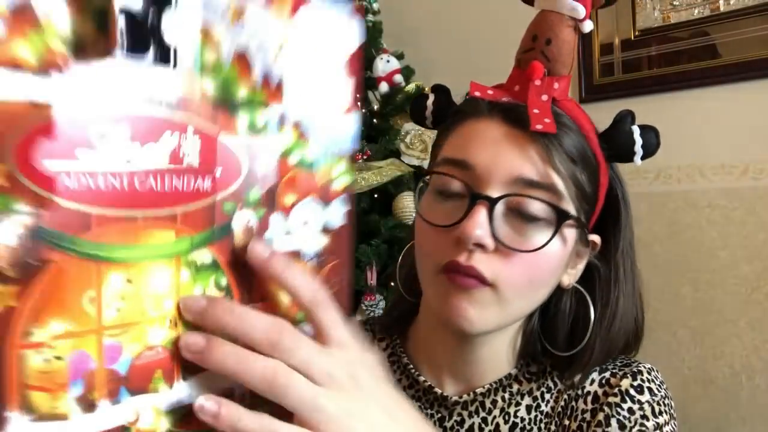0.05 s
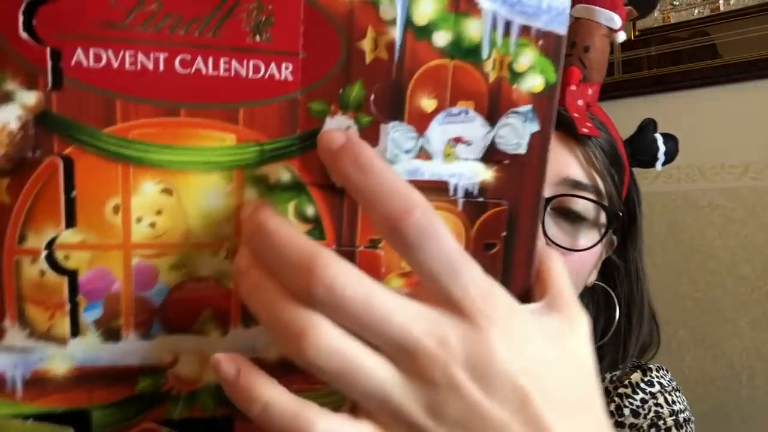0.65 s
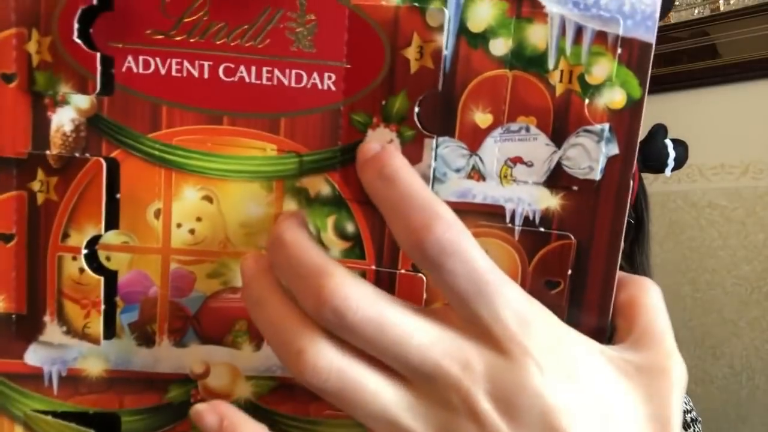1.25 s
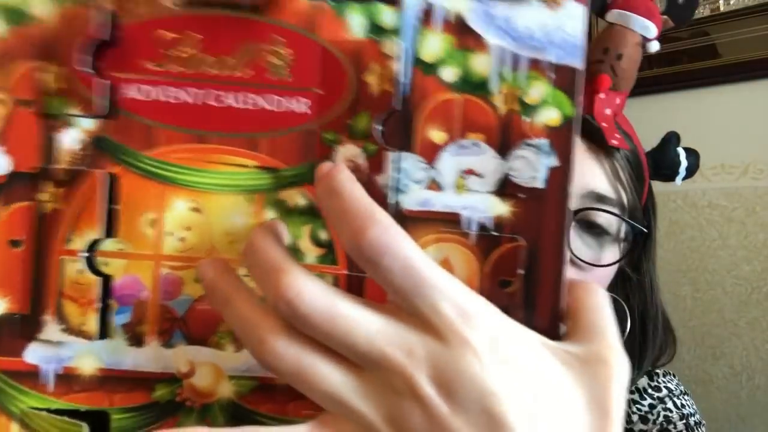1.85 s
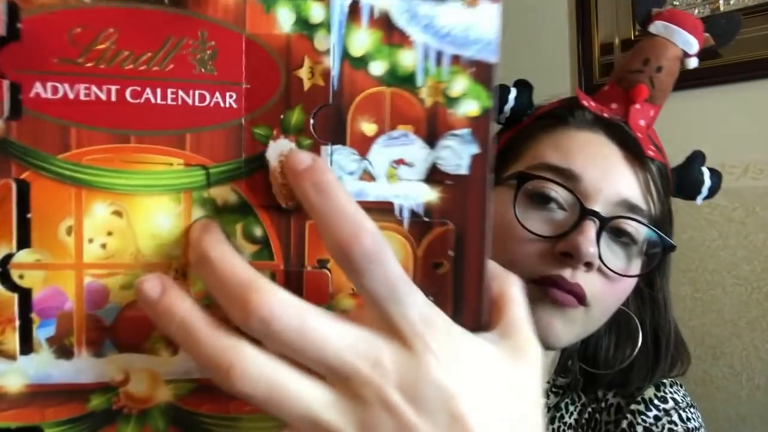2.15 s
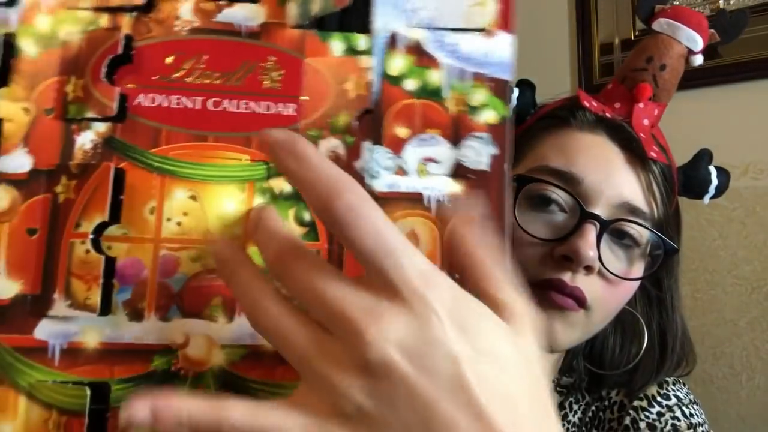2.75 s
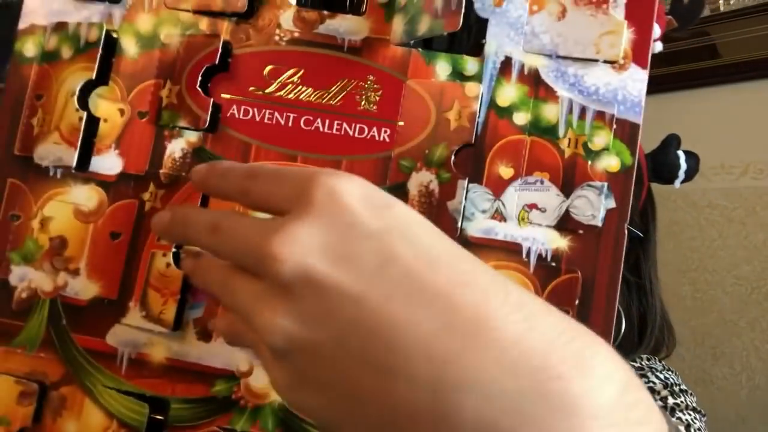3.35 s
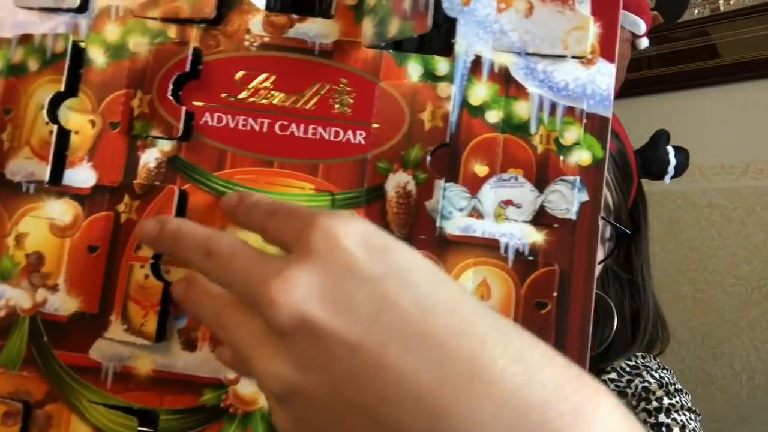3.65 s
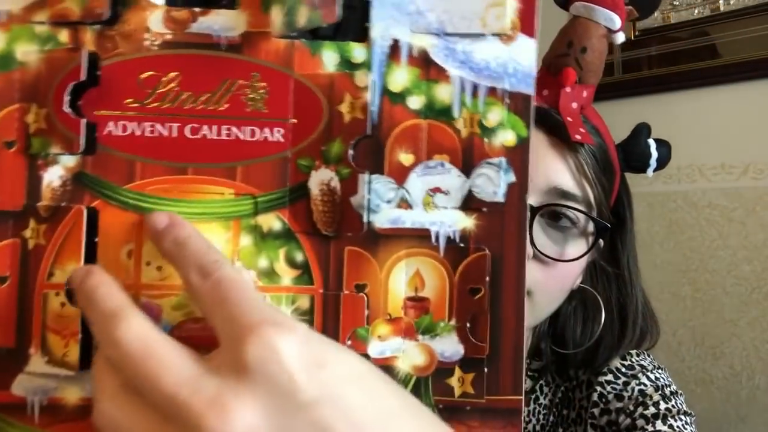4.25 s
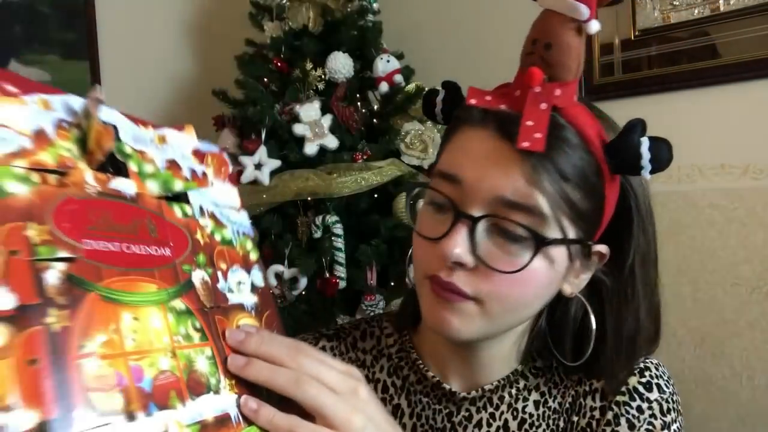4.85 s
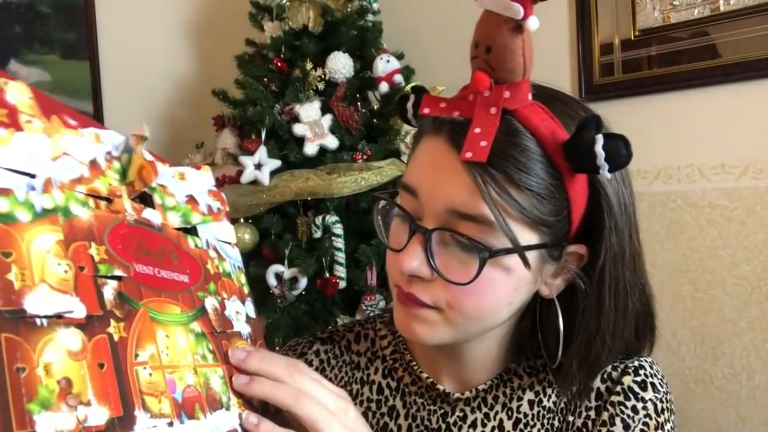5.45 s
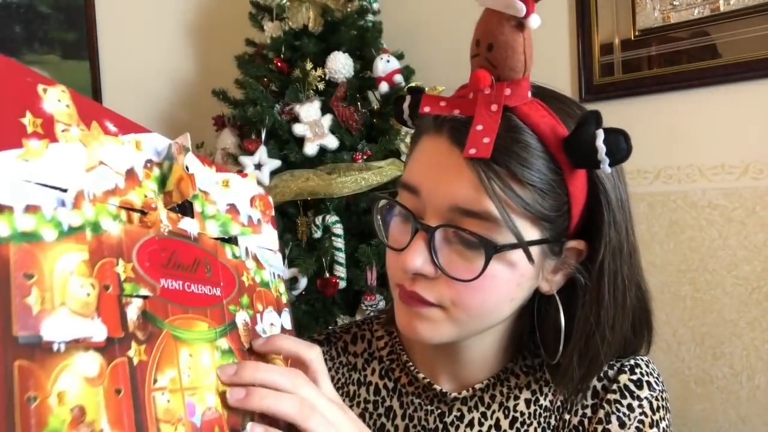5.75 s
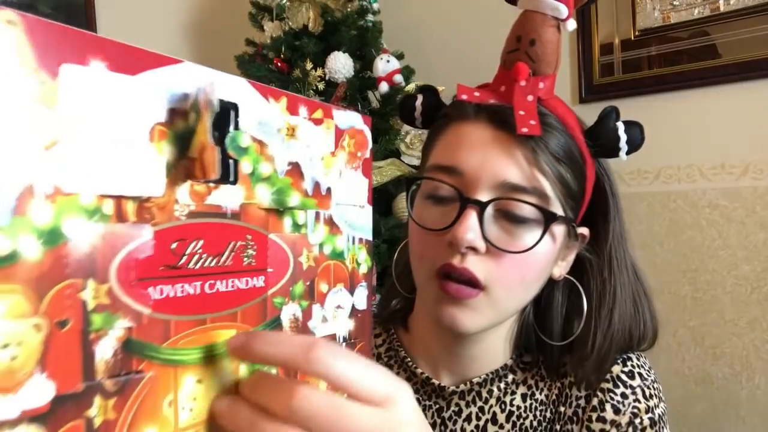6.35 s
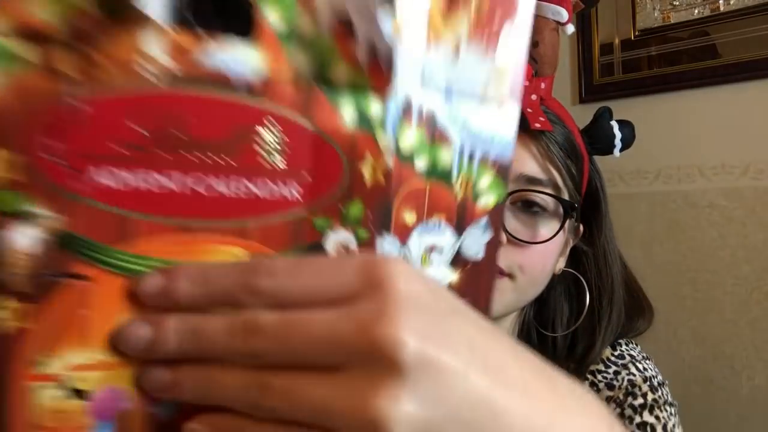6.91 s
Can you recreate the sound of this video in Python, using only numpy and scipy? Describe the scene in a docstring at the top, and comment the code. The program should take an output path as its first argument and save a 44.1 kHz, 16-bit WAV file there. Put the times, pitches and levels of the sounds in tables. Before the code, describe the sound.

A thin cardboard door is pressed and cracks open in sharp snaps, with fingers rubbing and tapping the hollow box.

```python
"""Living room, one microphone close to a thin cardboard box with a perforated door.
A fingertip leans on the door: the card creaks, the bridges snap one by one, the flap is pulled open.
Each release jolts the panel and the air behind it, and rattles between the edges of the card.
Fingers tap, rub and slide on the hollow box as it is turned, the skin sticking and slipping.
Further off, the walls answer each crack over faint room noise."""
import sys
import numpy as np
from scipy import signal
from scipy.fft import rfft, irfft, next_fast_len
from scipy.io import wavfile
from scipy.ndimage import uniform_filter1d, map_coordinates

SR = 44100
rng = np.random.default_rng(int(sys.argv[2]) if len(sys.argv) > 2 else 0)


def waveform_to_disk(signal):
    """Save audio, clipped to [-1, 1], as 16-bit WAV at the path in sys.argv[1]."""
    frames = np.transpose(np.atleast_2d(signal))
    scaled = np.clip(frames, -1, 1) * 32767
    samples = np.round(scaled).astype(np.int16)
    wavfile.write(sys.argv[1], SR, samples)


N = 307818
TIME = np.arange(N) / SR
SIZE = 4096  # samples in one response of the card
HZ = np.fft.rfftfreq(SIZE, 1 / SR)

# bridges breaking, the flap flicking free, the box knocking: t/s, panel level/dB, panel f/Hz,
# panel sharpness, hollow level/dB, crack f/Hz, crack level/dB, crack sharpness,
# relative upper mode/dB, edge echo delay/s, relative ring/dB
SNAPS = [(1.4339, -17, 1200, 0.31, -22.5, 3600, -16.5, 2.6, -16, 0.00094, -7),
         (1.4653, -29, 1200, 0.6, -44, 3080, -25.5, 11, -21, 0.0025, 0),
         (1.4697, -33, 1100, 0.99, -41.5, 3000, -49.5, 2, -10, 0.0013, 0),
         (1.7858, -22.5, 1746, 1.1, -53, 6385, -19, 11, 0.5, .0011, -10.5),
         (2.1128, -31.5, 2100, 2.9, -53, 6500, -23, 11, -18, 0.0022, -11),
         (2.7447, -26.5, 1250, 0.27, -37, 3470, -47, 2.7, -8, 0.00345, 1.5),
         (4.7235, -36.5, 1201, .25, -48.5, 2333, -60, 1.88, -7, 0.0004, -2),
         (6.3198, -66, 1997, 0.94, -78.5, 3030, -41, 34, -35, .001, 11)]
# card ticking under the fingers: t/s, level/dB, f/Hz, relative crispness/dB
TICKS = [(0.143, -55.5, 764, -33), (0.761, -46.5, 850, -22), (0.854, -53.5, 1070, -13),
         (0.922, -55.5, 1170, -8), (0.958, -52.5, 890, -13), (0.9739, -53, 910, -9),
         (0.986, -50.5, 800, -23), (0.997, -45, 845, -19), (1.0111, -44.5, 1780, -27),
         (1.016, -43.5, 1470, -8), (1.0384, -48.5, 890, -9), (1.052, -48.5, 850, -11),
         (1.0618, -47.5, 850, -3), (1.0762, -45, 1210, -3.5), (1.094, -42, 880, -3.5),
         (1.1168, -50.5, 1100, -10.5), (1.128, -46, 880, -11), (1.141, -57, 880, 0),
         (1.348, -40, 1180, -23), (1.3964, -45, 1200, -2), (1.4105, -50, 1990, 1), (1.656, -45.5, 1250, -2),
         (1.728, -42, 820, -15), (1.866, -45, 2400, -2), (2.033, -46.5, 2100, -21), (2.304, -49, 1800, -21),
         (2.434, -48.5, 2620, 1), (2.656, -52.5, 3200, -20), (2.662, -49.5, 3200, -12),
         (2.685, -50.5, 1120, -12), (2.702, -44, 1170, -1.5), (2.77, -42.5, 865, -32),
         (2.926, -44.5, 2070, 0), (2.962, -41.5, 1160, 1.5), (3.517, -49.5, 1030, -1.5),
         (3.691, -54, 725, 0.5), (4.164, -57.5, 1790, -16), (4.188, -58, 2200, -6),
         (4.421, -39.5, 1130, -8), (4.575, -50.5, 1880, -17), (4.591, -53, 1900, -10),
         (4.611, -51.5, 1700, -9), (4.736, -54, 2200, -9.5), (5.026, -62, 778, -23.5),
         (5.164, -65, 707, -36.5), (5.316, -59.5, 843, -23.5), (5.502, -56, 1713, -21.5),
         (5.867, -55.5, 1517, -13), (6.001, -50, 880, -9.5), (6.189, -54, 1100, -22.5),
         (6.375, -48, 1570, -1), (6.594, -51, 1090, -18), (6.656, -57, 1390, -19), (6.925, -53.5, 655, 0.5),
         (6.939, -48.5, 730, -3.5)]
# single fibres parting, grit catching under a nail: t/s, level/dB
FIBRES = [(0.706, -64), (1.764, -48.5), (1.897, -47.5), (2.186, -50.5), (2.825, -59.5), (2.908, -54),
          (2.942, -60), (3.091, -58), (3.425, -64), (3.455, -61), (3.553, -53), (3.572, -55), (3.836, -63),
          (4.511, -45.5), (4.563, -48.5), (4.805, -56), (4.868, -57.5), (5.525, -61.5), (5.958, -60.5),
          (6.32, -56), (6.412, -56.5)]
# skin and card edges sticking and slipping: start/s, end/s, slip rate/Hz, level/dB, relative crispness/dB
CREAKS = [(0.304, 0.328, 174, -56, -31), (0.436, 0.509, 118, -64.5, -32), (0.674, 0.689, 200, -53.5, -6.5),
          (0.863, 0.92, 105, -51, -16), (1.32, 1.347, 41, -48.5, 2), (1.994, 2.035, 156, -51.5, -3.5),
          (3.071, 3.081, 517, -47.5, -2), (3.17, 3.201, 256, -41, -10.5), (3.245, 3.284, 78, -49, -4.5),
          (4.219, 4.237, 690, -56, -2), (4.479, 4.489, 480, -42.5, -4), (5.633, 5.675, 150, -57.5, -6.5),
          (6.061, 6.123, 130, -55, -6.5), (6.261, 6.303, 106, -57, -9), (6.489, 6.646, 155, -56.5, -11),
          (6.811, 6.886, 170, -54.5, -7.5)]
# low booms of the box, some trailing just after a crack or tick: t/s, f/Hz, level/dB, t60/s
THUMPS = [(1.445, 68, -45, 0.11), (2.3, 75, -48, 0.074), (2.754, 82, -49, 0.11), (3.076, 120, -45, 0.068),
          (3.177, 167, -35, 0.049), (3.19, 73, -35, 0.066), (4.583, 77, -47, 0.11),
          (6.62, 69.4, -51.5, 0.14)]
# fingers and palm skimming the glossy face: t/s, half length/s, level/dB, f/Hz, sharpness
SWISHES = [(0.227, 0.036, -59.5, 3170, 1.5), (2.281, 0.013, -38, 2270, 1.17), (2.403, 0.05, -53, 2760, 4.9),
           (3.177, 0.051, -58.5, 7150, 0.48), (3.27, 0.13, -60, 3200, 4.8),
           (3.525, 0.14, -68.5, 3600, 0.44), (3.828, 0.069, -63.5, 3230, 0.48),
           (4.087, 0.16, -65, 4930, 0.56), (4.227, 0.0086, -40, 2300, 4.6), (4.498, 0.036, -49, 6000, 0.15),
           (4.567, 0.075, -54.5, 6750, 0.11), (6.37, 0.088, -63.5, 3007, 4.7),
           (6.538, 0.067, -50, 2400, 1.25)]
# a fingertip squealing on the gloss: start/s, end/s, start f/Hz, end f/Hz, level/dB
SQUEAKS = [(3.239, 3.3, 3080, 3870, -53), (3.777, 3.83, 2430, 2530, -59.5)]
# the fingertip leaning on the door: start/s, end/s, groan level/dB
PRESSES = [(0.884, 1.233, -53), (1.28, 1.883, -53.5)]
# how hard the hands work on the box: t/s, level/dB
EFFORT = [(0, -59), (0.33, -64.5), (0.57, -77), (0.8, -68), (1.03, -65), (1.27, -61), (1.52, -50.5),
          (1.7, -54), (2.25, -50.5), (2.59, -62.5), (2.79, -48), (3.05, -60.5), (3.3, -52), (3.92, -65.5),
          (4.35, -60.5), (4.55, -50), (5.0, -72.5), (5.5, -76), (5.8, -66), (6.25, -69), (6.58, -61),
          (6.74, -62.5), (6.98, -56.5)]

# resonances of the box: f/Hz, width/Hz, relative level/dB
BOX_MODES = [(140, 40, -3), (388, 20, -3), (492, 30, -2), (655, 35, -3), (865, 60, 1), (1245, 41, -2),
             (1400, 21, 0), (1700, 28, -8), (1930, 29, -4), (2340, 49, -6), (2910, 71, -10),
             (3630, 80, -11)]
# spectra: f/Hz, relative level/dB
DOOR = [(100, -40), (400, -16), (700, -8), (900, -2), (1100, 0), (1380, 1), (1580, -7), (1930, -3),
        (2500, -8), (3200, -18), (5000, -28), (16000, -44)]  # stiff card around the door
PANEL = [(100, -36), (400, -18), (650, -1), (900, -1), (1350, -1), (1700, -0.5), (2400, -5.5), (3200, -21),
         (5000, -28.5), (9000, -35), (16000, -52)]  # a face of the box
HOLLOW = [(25, -33.5), (70, -4.5), (150, -1), (195, -6), (270, 0.5), (520, 3.5), (800, -21), (2000, -35.5)]  # the air inside
CRISP = [(800, -27.5), (2000, 7), (3000, 6), (4500, 0), (7500, -6), (9500, -8), (16000, -18.5)]  # the dry top of a crack
SKIN = [(120, -19.5), (300, -8.5), (800, 7), (1400, 4), (2400, -1), (3500, -19), (6000, -35.5),
        (16000, -49)]  # skin dragging on the panel
HISS = [(1200, -18), (2400, -2), (3300, 5.5), (5000, -2.5), (7500, -6.5), (9000, -11.5), (16000, -15.5)]  # friction on the surface
RUMBLE = [(20, -24.5), (45, -8), (85, 0), (115, -3), (170, 0), (300, 1.5), (500, -5), (1200, -46.5)]  # handling heard in the hollow
ROOM_COLOUR = [(300, 3.5), (1500, 3), (4500, 1), (7000, -3), (12000, 1.5)]  # the answer of the walls
ROOM_NOISE = [(25, -15), (120, -4), (309, -7.5), (373, -5), (607, -13), (818, -11), (2550, -22),
              (7710, -22), (16000, -25.5)]  # the room at rest
MICROPHONE = [(20, -7), (45, 2), (70, 2.5), (8100, -1), (8900, -4.5)]  # response of the microphone
# decay of the card and of the room: f/Hz, t60/s
CARD_DECAY = [(100, 0.039), (400, 0.091), (1200, 0.069), (3000, 0.019), (7000, 0.025), (14000, 0.011)]
ROOM_DECAY = [(100, 0.7), (500, 0.42), (2000, 0.28), (7000, 0.34), (14000, .32)]


def snaps(fizz_db=-12, upper_mode_ratio=1.28):
    """Each bridge lets go at once: the panel and the air behind it jump, and the torn edge cracks."""
    out, crisp = np.zeros(N), boxed(CRISP)
    door, hollow = boxed(DOOR, lift=0.45), boxed(HOLLOW, lift=0.94)
    for (s, panel_db, panel_hz, panel_sharpness, hollow_db,
         crack_hz, crack_db, sharpness, upper_db, echo_s, ring_db) in SNAPS:
        # a smaller piece of card answers higher and narrower
        body = [amp(panel_db) * unit(door * hump(panel_hz, panel_sharpness)), amp(hollow_db) * hollow]
        # the crack is very brief, so its two modes have wide skirts
        upper_mode = amp(upper_db) ** 2 * hump(crack_hz * upper_mode_ratio, sharpness)
        modes = hump(crack_hz, sharpness) + upper_mode
        crack = unit(np.sqrt(modes) * hump(crack_hz, sharpness=0.63))
        edge = [amp(crack_db) * crack, amp(crack_db + fizz_db) * crisp]
        add(out, s, release([edge_echo(echo_s) * part for part in body + edge], ring_db))
    return out


def release(parts, ring_db, lag_s=0.0016, lag_at_hz=1000, knee_hz=35.8, level_window_s=0.01):
    """The card lets go once, sending a bending wave with the summed power of the spectra in parts."""
    gain = np.sqrt(sum(part ** 2 for part in parts))
    # the treble arrives first and the bass trails, falling from a crack to a thud
    dispersion = np.exp(-2j * np.pi * lag_s * lag_at_hz * np.log1p(HZ / knee_hz))
    # then the wave rattles between the edges of the panel
    rattle = 1 + amp(ring_db) * rfft(dying_noise(CARD_DECAY, SIZE))
    wave = unit(minimum_phase(gain) * dispersion * rattle)
    return irfft(wave) * np.sqrt(np.mean(gain ** 2) * SR * level_window_s)


def edge_echo(echo_s, echo_db=-7, loss_cycles=14):
    """Gain of a wave plus its return from the nearest edge; the card soaks up more with each cycle."""
    cycles = HZ * echo_s
    return unit(np.abs(1 + amp(echo_db) * np.exp(-cycles / loss_cycles - 2j * np.pi * cycles)))


def boxed(spectrum, lift=0.27):
    """A spectrum with the resonances of the box standing out of it, as a gain of rms 1."""
    modes = sum((lift * amp(db)) ** 2 / (1 + (2 * (HZ - centre) / width) ** 2)
                for centre, width, db in BOX_MODES)
    return unit(amp(along(spectrum, HZ)) * np.sqrt(1 + modes))


def hump(centre_hz, sharpness):
    """The broad resonance of a small piece of card, as a gain of rms 1."""
    ratio = (HZ + 1) / centre_hz
    return unit(1 / (1 + (sharpness / 2 * (ratio - 1 / ratio)) ** 2))


def ticks():
    """Sharp ticks as fibres give way and fingers land."""
    out = np.zeros(N)
    for s, db, pitch_hz, crisp_db in TICKS:
        add(out, s, amp(db) * tick(pitch_hz, crisp_db))
    return out


def tick(pitch_hz, crisp_db, hollow_db=-8):
    """One spot lets go: panel and hollow answer, with the spot's own pitch and brightness on top."""
    body = [boxed(PANEL), amp(hollow_db) * boxed(HOLLOW)]
    spot = [hump(pitch_hz, sharpness=4), amp(crisp_db) * boxed(CRISP)]
    return release(body + spot, ring_db=0.5)


def fibres(panel_db=-3):
    """A fibre parts with a tiny dry click and a lighter knock of the panel."""
    out = np.zeros(N)
    click = unit(boxed(CRISP) * hump(centre_hz=6000, sharpness=0.5))
    for s, db in FIBRES:
        add(out, s, amp(db) * release([click, amp(panel_db) * boxed(PANEL)], ring_db=-3))
    return out


def crinkle(count=42, easy_db=-65, growth=0.55, scatter_db=3, pitch_hz=1200, octaves=0.4, crisp_db=-9):
    """Faint ticks at chance moments, stronger the harder the box is handled."""
    out, push_db = np.zeros(N), effort()
    onsets = ((np.arange(count) + rng.random(count)) * (N - 1) / count).astype(int)
    for at, (strength, pitch, crisp) in zip(onsets, rng.standard_normal((count, 3))):
        sound = tick(pitch_hz * 2 ** (octaves * pitch), crisp_db + scatter_db * crisp)
        add(out, at / SR, amp(easy_db + growth * push_db[at] + scatter_db * strength) * sound)
    return out


def creaks(jitter=0.17, scatter_db=2.5, hollow_db=-8, swell_db=4):
    """Skin and card edges stick and slip in uneven runs that swell and fade."""
    out, panel, hollow, crisp = np.zeros(N), boxed(PANEL), boxed(HOLLOW), boxed(CRISP)
    for start, end, rate, db, crisp_db in CREAKS:
        chance = rng.standard_normal(size=(24, 2))
        parts = [panel, amp(hollow_db) * hollow, amp(crisp_db) * crisp]
        spots = [release(parts, ring_db=3) for _ in range(4)]  # these catch in turn
        for k, (s, (late, strength)) in enumerate(zip(np.arange(start, end, 1 / rate), chance)):
            swell = np.sin(np.pi * (s - start) / (end - start)) - 1
            gain = amp(db + swell_db * swell + scatter_db * strength)
            add(out, s + jitter * late / rate, gain * spots[k % len(spots)])
    return out


def thumps(attack_s=0.004):
    """The big face of the box swings for a few cycles."""
    out, t = np.zeros(N), np.arange(SR // 2) / SR
    for s, hz, db, t60 in THUMPS:
        envelope = np.exp(-np.log(1000) * t / t60) * (1 - np.exp(-t / attack_s))
        add(out, s, amp(db) * envelope * np.sin(2 * np.pi * hz * t))
    return out


def swishes():
    """A fast hand skims the gloss; the friction swells and fades."""
    friction = gritty(catches(rate=790, spread_db=0.5, smooth=1))
    return sum(amp(db) * np.exp(-((TIME - s) / half_s) ** 2) * through(friction, hump(hz, sharpness))
               for s, half_s, db, hz, sharpness in SWISHES)


def squeaks(waver=0.019, flutter_db=3):
    """Skin sticks and slips fast enough to give a rough, gliding note."""
    out = np.zeros(N)
    drift, flutter = 1 + waver * wobble(rate=460), amp(flutter_db * wobble(rate=210))
    for start, end, start_hz, end_hz, db in SQUEAKS:
        on = (TIME > start) & (TIME < end)
        progress = (TIME[on] - start) / (end - start)
        hz = (start_hz + (end_hz - start_hz) * progress) * drift[on]
        note = np.sqrt(2) * np.sin(2 * np.pi * np.cumsum(hz) / SR)
        out[on] += amp(db) * np.sin(np.pi * progress) * flutter[on] * note
    return out


def rubbing(drag_db=-60, hiss_db=-70, rumble_db=-66, hiss_growth=0.76, rumble_growth=0.67, unsteady_db=4):
    """Skin drags on the card: grain in the panel, hiss on the surface, rumble in the hollow."""
    push_db = effort()
    pressure = amp(unsteady_db * wobble(rate=35))
    drag = through(catches(rate=400, spread_db=2, smooth=1), boxed(SKIN, lift=0.41))
    drag = wandering_contact(drag)
    hiss = through(gritty(catches(rate=710, spread_db=-3, smooth=0.38)), boxed(HISS))
    rumble = coloured_noise(RUMBLE)
    friction = amp(drag_db + push_db) * drag + amp(hiss_db + hiss_growth * push_db) * hiss
    return pressure * friction + amp(rumble_db + rumble_growth * push_db) * rumble


def effort(easy_db=-60):
    """How far the hands are above an easy touch, in dB, for each sample."""
    return np.interp(TIME, *np.transpose(EFFORT)) - easy_db


def catches(rate, spread_db, smooth):
    """Tiny catches of random size, about rate a second, on a bed of smooth friction."""
    impulses = (rng.random(N) < rate / SR) * rng.choice([-1, 1], N)
    sizes = amp(spread_db * np.minimum(rng.standard_normal(N), 2))
    return unit(impulses * sizes) + smooth * rng.standard_normal(N)


def gritty(x, swing_db=3):
    """Stick and slip break smooth friction into short bursts."""
    return unit(x * amp(swing_db * wobble(rate=130)))


def wandering_contact(x, depth_db=2, patch_cells=5):
    """The contact point wanders, so the colour of the friction keeps shifting."""
    spectra = signal.stft(x, nperseg=512)[2]
    patches = rng.standard_normal(spectra.shape)
    for axis in (0, 1):
        patches = uniform_filter1d(patches, patch_cells, axis)
    return unit(signal.istft(spectra * amp(depth_db * unit(patches)), nperseg=512)[1][:N])


def crackle(easy_db=-76, growth=0.9):
    """Fingernails pick at the card in a fine, dry crackle that grows with effort."""
    clicks = catches(rate=110, spread_db=4, smooth=0)
    colour = boxed(CRISP) * hump(centre_hz=8000, sharpness=0.38)
    return amp(easy_db + growth * effort()) * through(clicks, colour)


def groan(ramp_s=0.06, unsteady_db=2):
    """The hollow box groans for as long as the fingertip leans on the door."""
    lean = sum(amp(db) * np.clip(np.minimum(TIME - start, end - TIME) / ramp_s, 0, 1)
               for start, end, db in PRESSES)
    strain = through(catches(rate=220, spread_db=2.5, smooth=0.7), hump(centre_hz=250, sharpness=1))
    return amp(unsteady_db * wobble(rate=14)) * lean * strain


def face_reflection(x, delay_s=0.00011, echo_db=-12.5):
    """Sound also reaches the microphone off the face of the box, hollowing out parts of the treble."""
    echo = amp(echo_db)
    return filtered(x, lambda hz: (1 + echo * np.exp(-2j * np.pi * hz * delay_s)) / (1 + echo))


def room(x, wet_db, build_s=0.0096):
    """The close sound, and behind it a tail from the walls that builds up quickly."""
    tail = dying_noise(ROOM_DECAY, SR) * (1 - np.exp(-np.arange(SR) / SR / build_s))
    tail = filtered(tail, lambda hz: amp(along(ROOM_COLOUR, hz)))
    return x + amp(wet_db) * signal.fftconvolve(x, tail)[:N]


def room_noise(level_db=-71.5):
    """The faint, steady hush of the living room."""
    return amp(level_db) * coloured_noise(ROOM_NOISE)


def amp(db):
    """Decibels to gain."""
    return 10 ** (np.asarray(db) / 20)


def unit(x):
    """Scale to rms 1."""
    return x / np.sqrt(np.mean(np.abs(x) ** 2) + 1e-20)


def along(points, hz):
    """Read (f/Hz, value) points on a log axis."""
    f, values = np.transpose(points)
    return np.interp(np.log(hz + 1), np.log(f + 1), values)


def add(track, s, sound):
    """Mix a sound into the track at s seconds."""
    rest = track[max(round(s * SR), 0):][:len(sound)]
    rest += sound[:len(rest)]


def wobble(rate):
    """A smooth random curve, rate knots a second."""
    return map_coordinates(rng.standard_normal(SIZE), [TIME * rate])


def filtered(x, response):
    """x filtered by a response given as a function of frequency."""
    size = next_fast_len(len(x) + SIZE)
    return irfft(rfft(x, size) * response(np.fft.rfftfreq(size, 1 / SR)), size)[:len(x)]


def minimum_phase(gain):
    """The causal response with this gain that rings out soonest."""
    cepstrum = irfft(np.log(np.maximum(gain, 1e-9)))
    cepstrum[1:SIZE // 2] *= 2
    cepstrum[SIZE // 2 + 1:] = 0
    return np.exp(rfft(cepstrum))


def through(x, gain):
    """x rung through a body with this gain, at rms 1."""
    return unit(signal.fftconvolve(x, irfft(minimum_phase(gain)))[:N])


def coloured_noise(spectrum):
    """Noise with the given spectrum, at rms 1."""
    return unit(filtered(rng.standard_normal(N), lambda hz: amp(along(spectrum, hz))))


def dying_noise(decay, size):
    """White noise of energy near 1 in which each octave dies at its own speed."""
    centres, octaves = np.geomspace(62, 16000, 9), np.arange(9)
    bin_octave = np.interp(np.log(np.fft.rfftfreq(size, 1 / SR) + 1), np.log(centres), octaves)
    masks = np.clip(1 - np.abs(bin_octave - octaves[:, None]), 0, 1)
    bands = irfft(rfft(rng.standard_normal(size)) * masks, size)
    fade = np.exp(-np.log(1000) * np.arange(size) / SR / along(decay, centres)[:, None])
    return np.sum(bands * fade / np.linalg.norm(fade, axis=1, keepdims=True), axis=0)


def scene():
    """The box up close, the living room behind it, in mono."""
    hush = room_noise()
    touches = ticks() + fibres() + crinkle() + creaks() + thumps() + swishes() + squeaks()
    cracks = room(face_reflection(snaps()), wet_db=-14)
    return (cracks + room(touches, wet_db=-10) + rubbing() + crackle() + groan() + hush)[None]


def record(dry, top_hz=16200):
    """The small microphone loses the deepest bass and some top; nothing is kept above top_hz."""
    return np.array([filtered(channel, lambda hz: amp(along(MICROPHONE, hz)) * (hz < top_hz))
                     for channel in dry])


dry = scene()
out = record(dry)
waveform_to_disk(out)
```